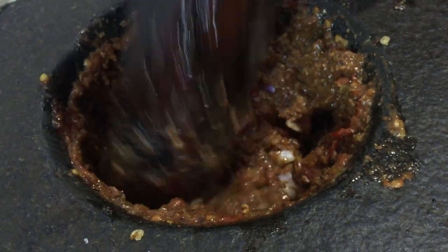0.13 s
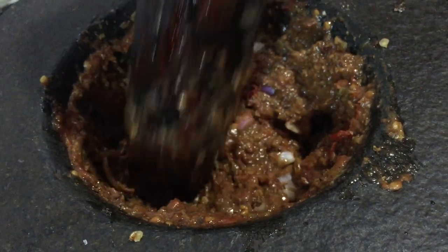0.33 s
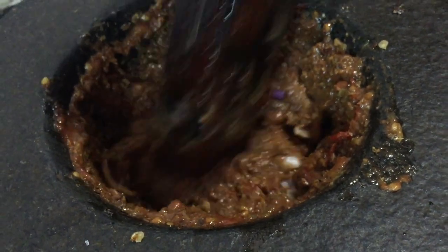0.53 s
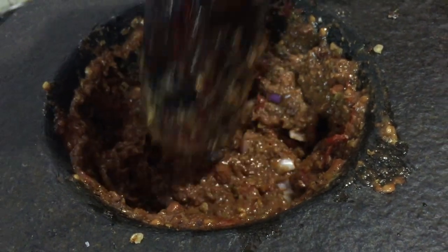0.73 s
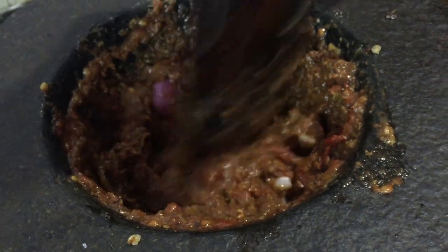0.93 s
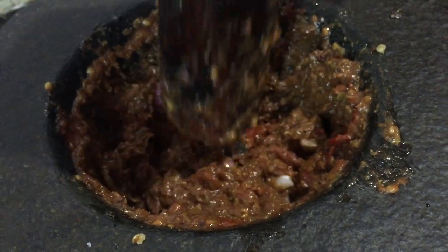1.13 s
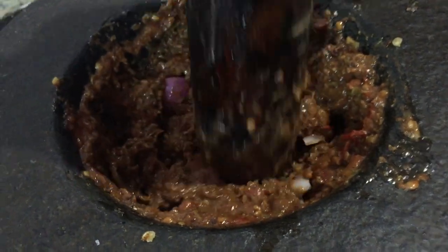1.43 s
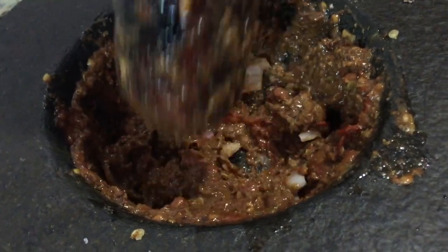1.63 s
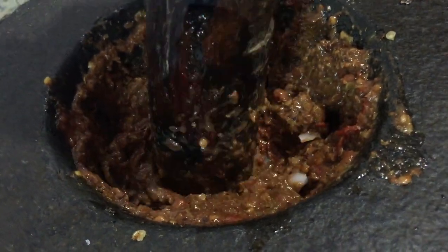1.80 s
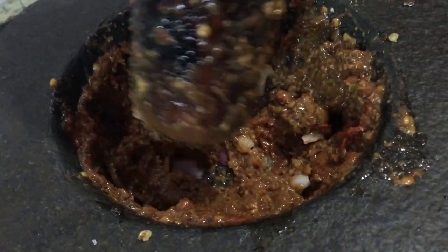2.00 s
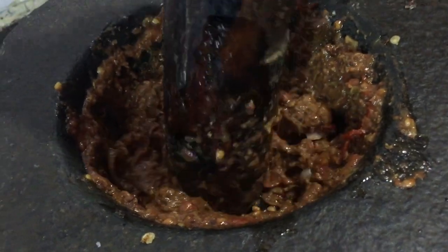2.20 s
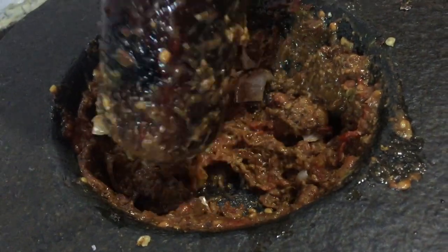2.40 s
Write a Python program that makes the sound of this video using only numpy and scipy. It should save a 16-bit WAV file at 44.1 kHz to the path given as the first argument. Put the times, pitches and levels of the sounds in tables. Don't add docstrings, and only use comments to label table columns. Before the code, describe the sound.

Close, slightly overloaded stone knocks in a mortar alternate between hard and soft, each wrapped in wet smacks and squelches and a low floor thud; quiet house hum, hiss and tiny bangle tinkles lie beneath.

```python
import sys
import numpy as np
from scipy import signal
from scipy.fft import rfft, irfft, next_fast_len
from scipy.io import wavfile
from scipy.ndimage import map_coordinates

SR = 44100
rng = np.random.default_rng(int(sys.argv[2]) if len(sys.argv) > 2 else 0)


def unload_wav(signal):
    wavfile.write(
        sys.argv[1],
        SR,
        np.round(np.clip(np.atleast_2d(signal).T, -1, 1) * 32767).astype(np.int16),
    )


def attenuation_scalar(level_db):
    decades = np.asarray(level_db, float) / 20
    return 10 ** decades


N = 112454

# f/Hz, level/(dB per Hz)
HUM = [(15, -73.5), (25, -24), (69, -6), (118, -11.5), (184, -7), (237, -21.5), (254, -33), (314, -39.5),
       (400, -29), (520, -59.5), (880, -120)]
# f/Hz, width/Hz, level/dB
SLAB = [(82.5, 9.2, 2.7), (116.2, 11, 0), (185, 19.3, -9.5)]
# t/s, level/dB
SHAKE = [(0.0, -46), (0.16, -57), (0.41, -48), (0.55, -50.5), (0.74, -52), (0.85, -53.5), (1.36, -54),
         (1.6, -45.5), (1.74, -46.5), (1.88, -53), (2.09, -47.5), (2.26, -43), (2.44, -53.5), (2.55, -66)]
# f/Hz, level/(dB per Hz)
HISS = [(150, -64), (250, -10.5), (1470, -13), (1580, -11.5), (2910, -10.5), (3180, -10.5), (9090, -11.5),
        (15100, -5), (16500, -27.5)]
# f/Hz, width/Hz, level/dB
PORT = [(5780, 690, 8.5), (9240, 2030, 14), (10420, 750, -9.5)]
# t/s, level/dB, f/Hz
TINKLES = [(0.085, -43, 14400), (0.087, -48, 12800), (0.087, -49, 8000), (0.1555, -44, 13700),
           (0.1555, -46, 14400), (0.319, -49, 12850), (0.335, -49, 12850), (.4843, -42, 12800),
           (0.484, -43, 14400), (0.553, -42, 12800), (.553, -45, 14400), (.560, -42, 13300),
           (.566, -45, 12800), (.556, -46, 8550), (0.949, -43, 13700), (1.2355, -41, 8000),
           (1.236, -44, 8550), (1.235, -38, 14450), (1.24, -48, 12800), (1.262, -48, 12800),
           (1.3513, -38, 13700), (1.3513, -42, 14450), (1.352, -42, 8550), (1.356, -46, 12800),
           (1.362, -45, 13700), (1.450, -46, 13700), (1.45, -49, 14400), (1.453, -47, 8550),
           (1.484, -46, 14450), (1.488, -46, 13700), (1.488, -47, 8550), (1.527, -42, 12800),
           (1.527, -43, 14500), (1.528, -46, 8550), (1.702, -46, 12750), (1.82, -47, 13700),
           (2.1705, -46, 13800), (2.2957, -42, 12800), (2.297, -46, 14400), (2.30, -48, 13700)]
# f/Hz, t60/s
ROOM = [(200, 0.58), (500, 0.19), (1100, 0.3), (2900, 0.24), (7000, 0.24)]
# t/s, knock level/dB, contact f/Hz, hardness/(dB per octave), crack level/dB
BLOWS = [
    (0.2157, -24, 376, -5, -62.5),
    (0.2278, -7, 848, 3, -22),
    (0.2387, -0.5, 1043, -1, -10.5),
    (0.6169, -6.5, 796, -17.5, -16.5),
    (0.9901, -25, 338, -34, -25.5),
    (1.0124, -26, 640, -10, -51),
    (1.4016, -4, 694, 1, -12.5),
    (1.811, -20, 642, -10.5, -50),
    (2.2040, -4.5, 778, -3, -12.5),
]
# f/Hz, level/dB, f/Hz, level/dB, level above 1.9 kHz/dB
SPOTS = [
    (555, 2.5, 2335, 1.5, 0),
    (660, -8.5, 2335, -7, 2.5),
    (1017, 3.5, 820, 6, 2.5),
    (632, -2, 1017, 1, 8),
    (549, 9.5, 1017, -4, -5),
    (660, 5, 2460, 20, 0.5),
    (1017, 1, 2460, 7, 1.9),
    (660, 2.5, 1017, -8, -.1),
    (666, 5.5, 1017, 1, 2.5),
]
# f/Hz, level/dB, t60/s
STONE = [(375.6, -15, 0.076), (556.8, -9, 0.17), (606.4, -9, 0.21), (665, -3, 0.1), (767, -21, 0.042),
         (830, -31.5, 0.18), (837.6, -17.5, 0.27), (894, -15.5, 0.24), (1016, 1.5, 0.12),
         (1159, -5, 0.033), (1347, -20.5, 0.14), (1474, -4, 0.046), (1645, -4.5, 0.033), (1761, -10, 0.03),
         (1985, -12, .05), (2170, -13, .045), (2338, -4, 0.075), (2462, -9, 0.16), (2570, -18, .1),
          (5370, -30, 0.05)]
# f/Hz, level/(dB per Hz)
GRIT = [(200, -18), (400, -6), (700, 0), (1200, -2), (1800, -7), (2400, -5), (2900, -20), (9000, -50)]
# f/Hz, level/(dB per Hz)
CRACK = [(800, 8.5), (2500, -3.5), (4200, -1.5), (7000, -7), (12000, -12), (16000, -35.5)]
# t/s, level/dB, level of the deepest modes/dB
BOOMS = [
    (.224, -27, 7.5),
    (.247, -18, -7.5),
    (0.622, -25, 0.5),
    (1.0207, -27.5, -7.5),
    (1.038, -35, -13),
    (1.411, -18, -4),
    (1.819, -28.5, -5),
    (2.213, -21, -4.5),
]
# f/Hz, level/dB, t60/s, rise/s
FLOOR = [(61.6, -38, 0.16, .02), (83.06, 11, 0.23, 0.034), (111.3, 3.5, 0.32, 0.0046),
         (119, -2, 0.042, 0.005), (201.8, 7, 0.037, 0.0046), (227, -3, 0.086, 0.00098),
         (279, -12.5, 0.28, 0.011)]
# t/s, length/s, level/dB, grain f/Hz
SQUELCHES = [(0.575, 0.036, -30.5, 1300), (0.592, 0.027, -22.5, 3300), (0.972, 0.017, -40.5, 1536),
             (0.983, 0.03, -32.5, 2800), (0.992, 0.025, -44, 900), (1.007, 0.026, -20.5, 3240),
             (1.025, 0.017, -35, 2520), (1.113, 0.022, -37.5, 3200), (1.141, 0.02, -46.5, 1660),
             (1.377, 0.0084, -31, 3020), (1.383, 0.023, -28, 2223), (1.468, 0.056, -53, 2420),
             (1.791, 0.02, -25.5, 1250), (1.789, 0.021, -19.5, 4270), (1.903, 0.013, -33, 1500),
             (1.914, .026, -36.5, 1300), (1.933, .03, -50, 1400), (2.175, 0.014, -30, 3000),
             (2.185, 0.012, -34.5, 2540), (2.196, 0.01, -24.5, 2600), (2.318, 0.031, -48, 3230),
             (0.308, 0.032, -59, 3890), (0.713, 0.027, -50, 2180), (0.227, 0.0095, -18.5, 6870)]
# t/s, level/dB
SNAPS = [
    (0.2295, -17),
    (1.3762, -33),
    (1.4098, -29),
    (1.7843, -27),
    (2.187, -36),
    (2.199, -35),
    (0.5885, -37),
    (1.7905, -37),
]
# t/s, level/dB, f/Hz
SMACKS = [(0.334, -33, 5000), (0.3635, -34, 4570), (0.569, -33.5, 2660), (0.5883, -26, 3300),
          (0.5933, -44.5, 1300), (0.6067, -16, 3670), (0.6071, -24, 2360), (0.7323, -32.5, 2000),
          (.738, -33.5, 1830), (1.1417, -33.5, 2980), (1.168, -32.5, 4500), (0.7314, -27.5, 5500),
          (1.017, -20, 6050), (1.0235, -37, 3740), (0.987, -37.5, 2390), (1.169, -39.5, 1550),
          (1.3802, -27.5, 2430), (1.381, -45, 1180), (1.388, -34, 3100), (1.4089, -23.5, 4070),
          (1.4045, -8, 3356), (2.203, -11, 3420), (1.498, -50.5, 3200), (1.508, -18, 2430),
          (1.542, -32, 2350), (1.55, -43, 6800), (1.907, -33.5, 1730), (1.9147, -33, 1470),
          (1.9226, -36, 1050), (1.926, -28, 2000), (1.931, -28.5, 3770), (1.933, -38, 1340),
          (1.9389, -39, 1100), (1.9449, -32.5, 3200), (1.9452, -47, 6400), (1.949, -37, 3300),
          (1.7851, -19, 2730), (1.793, -31, 1460), (1.7919, -33.5, 1170), (1.7963, -24.5, 4080),
          (2.178, -24.5, 3500), (2.1915, -29.5, 2300), (2.323, -40.5, 3170), (2.339, -42, 2340),
          (2.351, -46.5, 2950)]


def unit(x):
    return x / np.sqrt(np.mean(x ** 2) + 1e-20)


def along(points, hz):
    f, v = np.transpose(points)
    return np.interp(np.log(hz + 1), np.log(f + 1), v)


def noise(gain_db, size=N):
    m = next_fast_len(size)
    spectrum = rfft(rng.standard_normal(m)) * attenuation_scalar(gain_db(np.fft.rfftfreq(m, 1 / SR)))
    return unit(irfft(spectrum, m)[:size])


def sway(rate_hz):
    return map_coordinates(rng.standard_normal(40), [np.arange(N) * rate_hz / SR])


def add(track, s, sound):
    part = track[round(s * SR):][:len(sound)]
    part += sound[:len(part)]


def ring(hz, t60, rise, seconds, drift=0):
    t = np.arange(round(seconds * SR)) / SR
    return np.sin(2 * np.pi * hz * t + drift) * attenuation_scalar(-60 * t / t60) * (1 - np.exp(-t / rise))


def house_hum():
    return attenuation_scalar(-54.5 + 2.5 * sway(6)) * noise(lambda hz: along(HUM, hz))


def slab_shake():
    def resonances_db(hz):
        power = sum(attenuation_scalar(2 * db) / (1 + (2 * (hz - c) / width) ** 4) for c, width, db in SLAB)
        return 10 * np.log10(power)

    s, shake_db = np.transpose(SHAKE)
    level_db = 0.5 + np.interp(np.arange(N) / SR, s, shake_db)
    return attenuation_scalar(level_db) * noise(resonances_db)


def microphone_hiss():
    def colour_db(hz):
        port_db = sum(db * np.exp(-((hz - c) / width) ** 2) for c, width, db in PORT)
        return along(HISS, hz) + port_db

    return attenuation_scalar(-50.5 + 0.8 * sway(5)) * noise(colour_db)


def bangles():
    out = np.zeros(N)
    for s, db, hz in TINKLES:
        level = attenuation_scalar(db - 0.5)
        tick = attenuation_scalar(-3) * np.diff(rng.standard_normal(45), 2) / 3 * np.hanning(43)
        drift = 0.025 * np.cumsum(rng.standard_normal(SR // 10))
        add(out, s, level * ring(hz, 0.06, 0.00023, 0.1, drift))
        add(out, s, level * tick)
    return out


def room(x):
    hz, t, z = signal.stft(rng.standard_normal(SR // 3), SR, nperseg=256)
    decay = attenuation_scalar(-60 * t / along(ROOM, hz)[:, None])
    tail = signal.istft(z * decay * (hz > 200)[:, None], SR, nperseg=256)[1]
    return signal.fftconvolve(np.pad(x, (200, 0)), tail / np.linalg.norm(tail))


def stone_modes(tilt_db, spot, t, span):
    favoured, high_db = (spot[:2], spot[2:4]), spot[4]
    modes = STONE
    luck_db = 1.5 * rng.standard_normal(len(modes))
    steps = rng.standard_normal((len(modes), len(t)))
    drift = 0.55 * np.cumsum(steps, axis=1) / np.sqrt(SR / 100)
    stone = np.zeros(len(t))
    for k, (hz, db, t60) in enumerate(modes):
        near_db = sum(g * np.exp(-(np.log2(hz / c) / 0.07) ** 2) for c, g in favoured)
        near_db += high_db * (hz > 1900)
        level = attenuation_scalar(db + luck_db[k] + tilt_db(hz) + near_db)
        stone += (-1) ** k * level * ring(hz, t60, 0.0001, span, drift[k])
    return stone * (1 + attenuation_scalar(7 - 60 * t / 0.034)) / 2


def stone_knocks():
    out, span = np.zeros(N), 0.3
    t = np.arange(round(span * SR)) / SR
    for (s, db, push_hz, hard_db, crack_db), spot in zip(BLOWS, SPOTS):
        def tilt_db(hz):
            return hard_db * np.log2(np.maximum(hz / 1100, 1))

        stone = stone_modes(tilt_db, spot, t, span)
        grit = noise(lambda hz: along(GRIT, hz) + tilt_db(hz), size=len(t))
        grit *= attenuation_scalar(-4 - 60 * t / 0.12) * (1 - np.exp(-t / 0.00067))
        crack = attenuation_scalar(crack_db - 60 * t / 0.009) * noise(lambda hz: along(CRACK, hz), size=len(t))
        push = attenuation_scalar(15) * ring(push_hz, 8.8 / push_hz, 0.00029, span)
        knock = attenuation_scalar(db - 12) * (stone + grit - push) + crack
        add(out, s, knock)
        add(out, s, attenuation_scalar(-17) * room(knock))
    return out


def floor_booms():
    out, span = np.zeros(N), 0.6
    for s, boom_db, deep_db in BOOMS:
        boom = np.zeros(round(span * SR))
        for hz, db, t60, rise in FLOOR:
            main = ring(hz, t60, rise, span)
            linger = attenuation_scalar(-26) * ring(hz, 4 * t60, rise, span)
            boom += attenuation_scalar(db + deep_db * (hz < 95)) * (main + linger)
        t = np.arange(len(boom)) / SR
        drop_db = -7.5 * (1 + np.tanh((t - 0.037) / 0.0025)) / 2
        fade = np.hanning(2 * len(boom))[len(boom):]
        add(out, s, attenuation_scalar(boom_db + drop_db) * boom * fade)
    return out


def squelches():
    out, grains = np.zeros(N), 160
    for s, length, db, hz in SQUELCHES:
        when = rng.random(grains)
        pitch = np.clip(hz * np.exp(0.4 * rng.standard_normal(grains)), 750, 14000)
        size_db = 3 * rng.standard_normal(grains)
        swell = np.sin(np.pi * when ** 0.82) ** 0.5
        for u, f, g, w in zip(when, pitch, size_db, swell):
            add(out, s + length * u, attenuation_scalar(db - 12 + g) * w * ring(f, 8 / f, 0.000067, 0.012))
    return out


def snap(db):
    return attenuation_scalar(db - 60 * np.arange(441) / SR / 0.005) * rng.standard_normal(441)


def husk_snaps():
    out = np.zeros(N)
    for s, db in SNAPS:
        add(out, s, snap(db))
    return out


def smacks():
    out = np.zeros(N)
    for s, db, hz in SMACKS:
        add(out, s, attenuation_scalar(db + 10) * (ring(hz, 8 / hz, 0.00029, 0.01) + snap(-26)))
    return out


def paste():
    wet = squelches() + husk_snaps() + smacks()
    return wet + attenuation_scalar(-14) * room(wet)[:N]


def scene():
    background = house_hum() + slab_shake() + microphone_hiss()
    return (background + bangles() + stone_knocks() + floor_booms() + paste())[None]


def band_limit(x):
    return signal.sosfilt(signal.butter(12, 16660, fs=SR, output="sos"), x)


def record(dry):
    low_cut = signal.butter(2, 51, 'high', fs=SR, output='sos')
    heard = signal.sosfilt(low_cut, dry)
    ceiling, hardness = 0.54, 6
    flattened = heard / (1 + np.abs(heard / ceiling) ** hardness) ** (1 / hardness)
    top_cut = np.clip((15900 - np.fft.rfftfreq(N, 1 / SR)) / 100, 0.02, 1)
    mix = irfft(rfft(flattened) * top_cut, N)
    return band_limit(mix)


dry = scene()
out = record(dry)
unload_wav(out)
```